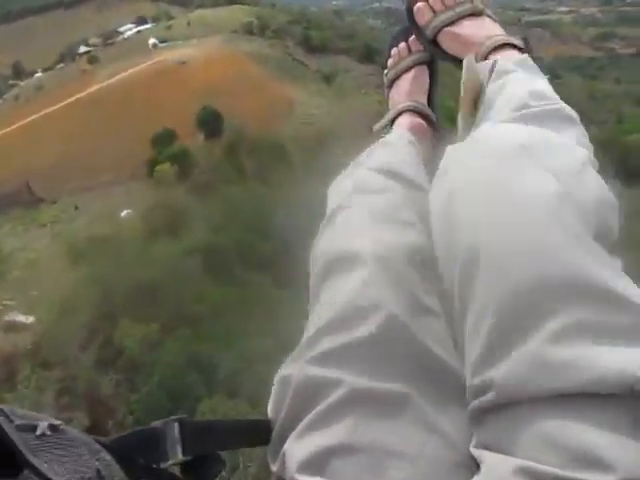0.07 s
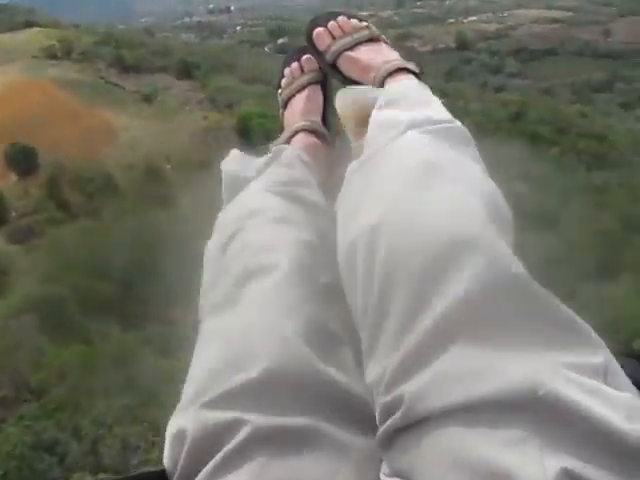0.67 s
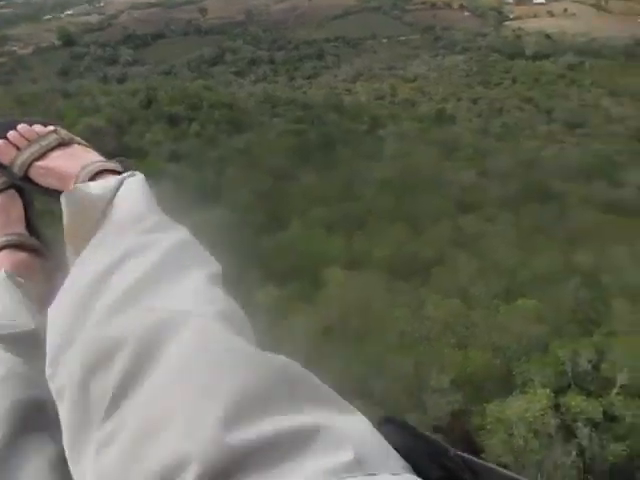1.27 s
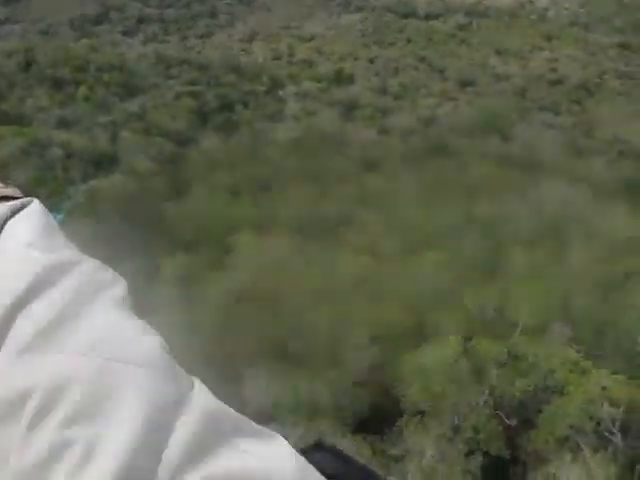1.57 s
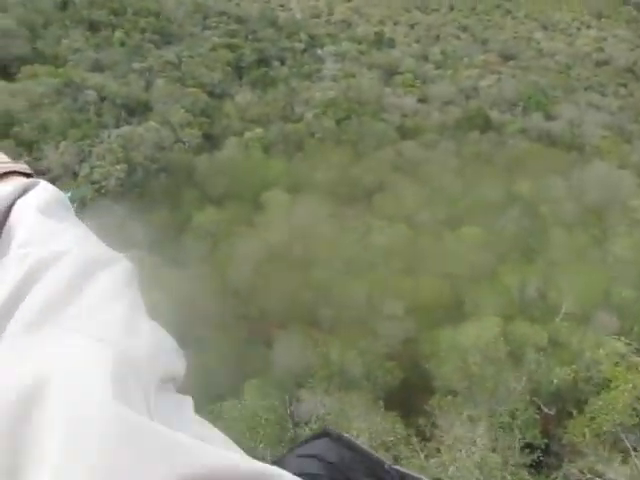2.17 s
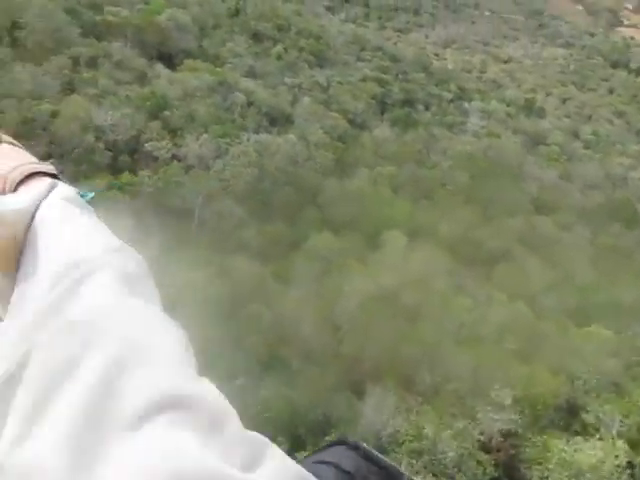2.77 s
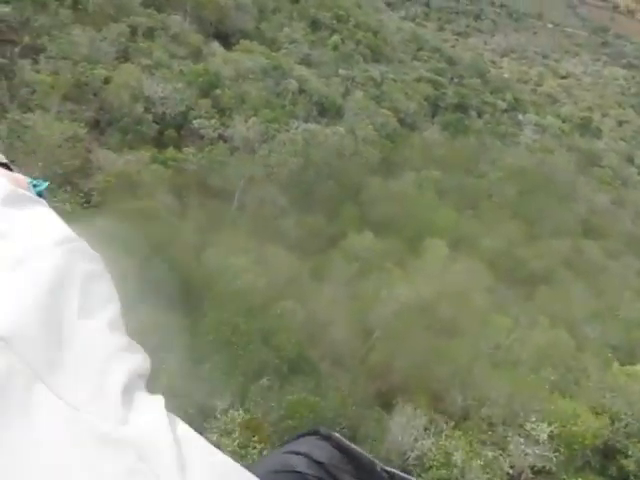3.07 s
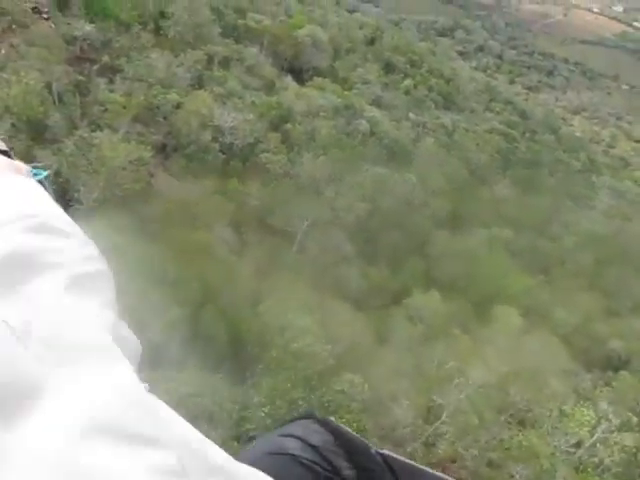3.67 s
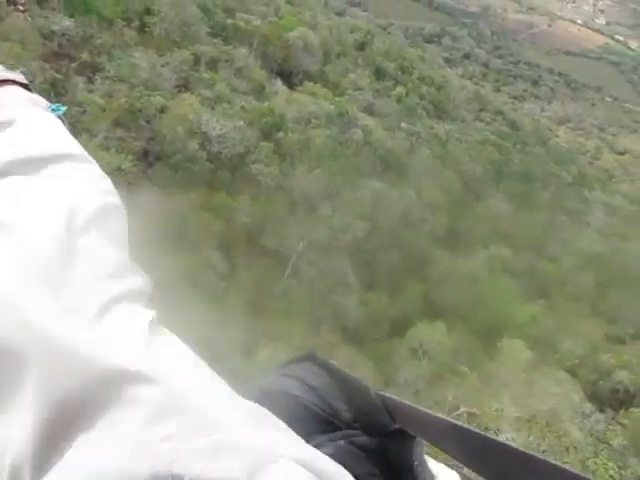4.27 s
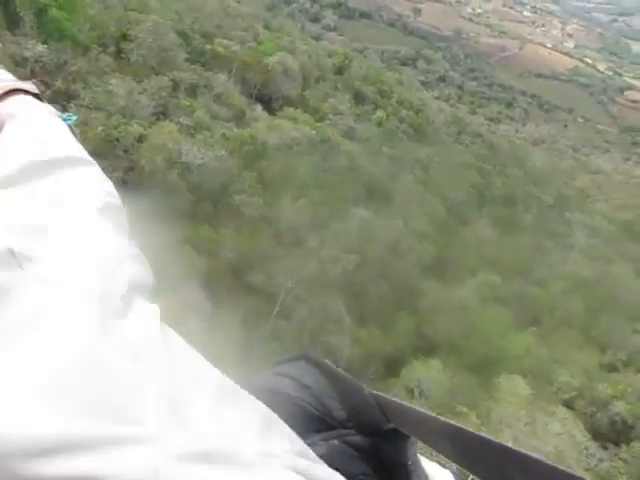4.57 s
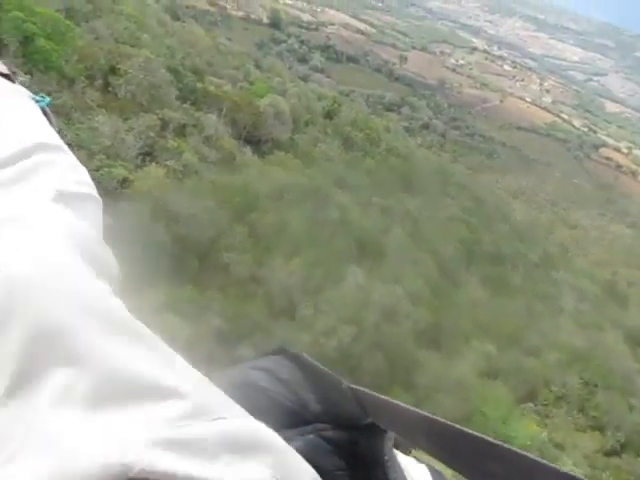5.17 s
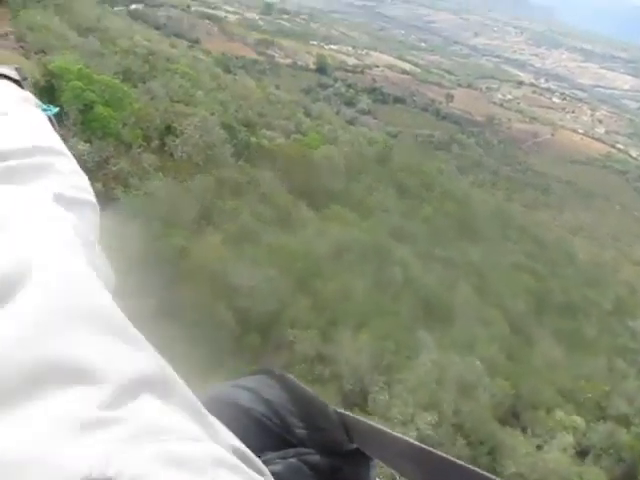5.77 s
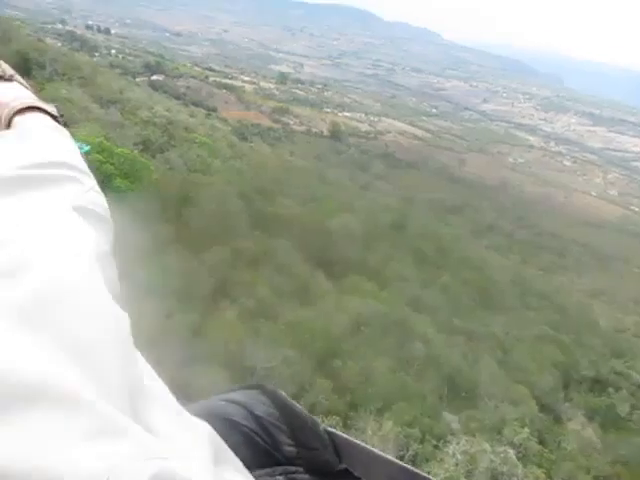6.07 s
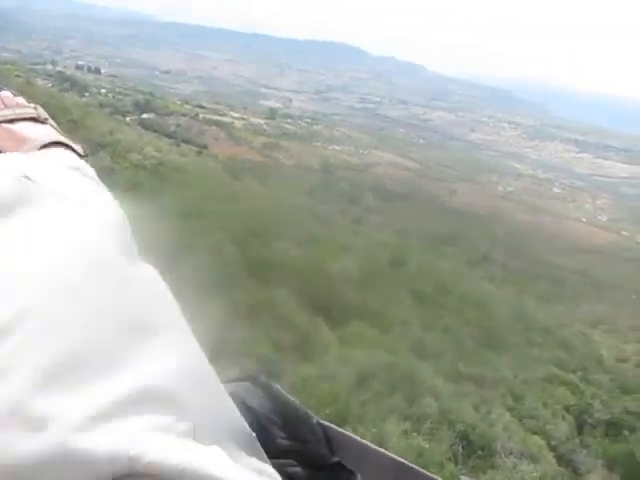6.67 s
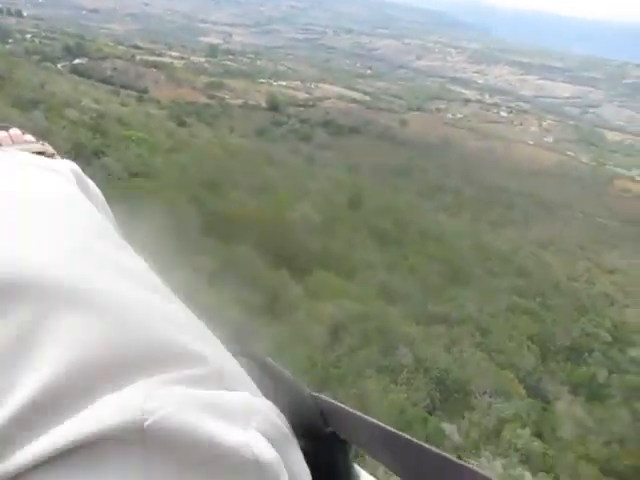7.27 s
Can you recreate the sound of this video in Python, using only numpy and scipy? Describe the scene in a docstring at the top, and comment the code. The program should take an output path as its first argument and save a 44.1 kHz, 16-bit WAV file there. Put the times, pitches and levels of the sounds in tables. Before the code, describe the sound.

Wind streams past a hand-held camera on a glider high above hills, a steady rush with low buffeting on the microphone. It starts soft, with a few faint finger scrapes, then grows stronger and brighter through the middle. Late on, a quick run of sharp ticks ends in two hard knocks on the case, followed by a light rub, more clicks and dull bumps. Everything is close, with no echo.

```python
"""Wind on a camera in a glider

High above hills, air streams past a hand-held camera, growing stronger and easing again.
It buffets the microphone port and rushes through the hollows of the case, whose resonances colour it.
A hand rubs and shifts on the camera: faint scrapes, sharp ticks, two hard knocks and a few dull bumps.
Underneath, the electronics hiss and whine faintly."""
import sys
import numpy as np
from scipy import signal
from scipy.fft import rfft, irfft, next_fast_len
from scipy.io import wavfile
from scipy.ndimage import map_coordinates

SR = 44100
rng = np.random.default_rng(int(sys.argv[2]) if len(sys.argv) > 2 else 0)


def digitize_waveform(pressure):
    """Quantize a signal to 16-bit integers and store it at the path in sys.argv[1].

    Rows of a 2-D input are taken as channels; values are limited to [-1, 1].
    """
    field = np.atleast_2d(pressure).T
    bounded = np.clip(field, -1, 1)
    quanta = np.round(bounded * 32767).astype(np.int16)
    wavfile.write(sys.argv[1], SR, quanta)


N = 331632

# The strength of the airstream, driving every wind layer. Each row: time in seconds, level in dB.
FLOW = [(0, -51), (.5, -53), (1, -50.5), (1.5, -52.5), (2.2, -50.5), (2.7, -46.5), (3.45, -45),
        (4.1, -43.5), (5.3, -43.5), (5.9, -48.5), (6.33, -45.8), (6.5, -46.5), (6.75, -45.5), (6.95, -49.5),
        (7.1, -44.5), (7.25, -43.5), (7.35, -45.5), (7.52, -44)]


def buffeting(lumps_db=1, churn_db=2.0, surge_db=1, rise_db_per_s=0.66):
    """Large eddies thump on the port in surges and smaller ones churn above them."""
    # Deep rumble and the churn above it. Each row: frequency in Hz, relative level in dB.
    large_spectrum = [(4, -6), (12, 0.5), (27, -3), (45, -5), (80, -11), (140, -25), (300, -33.5),
                      (900, -87)]
    small_spectrum = [(30, -19), (70, -4), (100, 3.5), (150, -1), (215, -4.5), (300, -11), (420, -21),
                      (900, -56)]
    large = unit(noise(large_spectrum) * amp(lumps_db * wobble(30) + surge_db * wobble(4.08)))
    small = unit(noise(small_spectrum) * amp(churn_db * wobble(35)))
    from_middle_s = (np.arange(N) - N / 2) / SR
    large *= amp(rise_db_per_s * from_middle_s)  # the air grows rougher as the flight goes on
    large *= wind_gain(base_db=-33.5, growth=0.51, cross_db=-1.5)
    small *= wind_gain(base_db=-46.5, growth=0.75, cross_db=9.2)
    return large + small


def airstream(rush_db=2, flutter_db=.5):
    """Air rushes over the case and sprays off its edges; all bands flutter together."""
    # Broad rush, bright spray and a narrow hollow note. Each row: frequency in Hz, relative level in dB.
    rush_spectrum = [(60, -21), (300, 3), (500, -0.5), (1000, 0.5), (1400, -0.5), (2000, -3.5), (2700, -16),
                     (4000, -38.5), (8000, -60)]
    spray_spectrum = [(1000, -15), (2000, 5), (2700, 0.5), (3600, -5.5), (5000, -9.5), (7000, -15),
                      (10000, -19.5), (13000, -28), (17000, -48)]
    hollow_spectrum = [(900, -14), (1450, -4), (1750, -1.5), (1880, 5), (2050, -13), (2700, -82)]
    rush = amp(envelope(FLOW) + rush_db) * noise(rush_spectrum, through_case=True)
    spray = wind_gain(base_db=-53, growth=1.71, cross_db=2.5) * noise(spray_spectrum, through_case=True)
    hollow = wind_gain(base_db=-59.5, growth=1.12, cross_db=12.6) * noise(hollow_spectrum)
    return (rush + spray + hollow) * amp(flutter_db * wobble(30))


def wind_gain(base_db, growth, cross_db, cruise_db=-47):
    """A wind layer's fader: it moves growth dB per dB of flow, and a full crosswind adds cross_db."""
    return amp(base_db + growth * (envelope(FLOW) - cruise_db) + cross_db * crosswind())


def crosswind():
    """How squarely the air crosses the port: each gust swells and fades like a bell curve."""
    # Each row: peak time in seconds, half length in seconds, strength from 0 to 1.
    gusts = [(2.12, .54, 0.99), (5.043, 0.52, 0.78)]
    t = np.arange(N) / SR
    return sum(strength * np.exp(-.5 * ((t - peak) / half) ** 2) for peak, half, strength in gusts)


def case_db(hz):
    """The lift that the hollows of the case give to each frequency."""
    # Each row: centre in Hz, width in Hz, lift in dB.
    hollows = [(569, 35, 5), (649, 67, 5.5), (1060, 60, 2), (1338, 110, 2), (2362, 215, 8),
               (3197, 400, 9.5), (4037, 195, 8.5), (4370, 255, 9), (5045, 570, 7.5), (5600, 350, 4.5),
               (6500, 570, 5.5), (7670, 850, 4.5), (11000, 400, 7)]
    return sum(db * np.exp(-np.log(2) * (2 * (hz - centre) / width) ** 2)
               for centre, width, db in hollows)


def handling(snap_t60=0.0087, snap_rise_s=.0001, crack_db=-21):
    """Ticks and knocks snap and ring the shell; bumps push on the microphone, which swings back."""
    # Small sharp contacts. Each row: start in seconds, snap level in dB, ring level in dB.
    ticks = [(0.771, -54, -38), (0.9403, -46, -36), (4.762, -34.5, -55), (5.6190, -23.5, -28.5),
             (5.7304, -21.5, -21.5), (5.7437, -26, -55), (5.754, -24, -50), (5.8564, -28.5, -27),
             (5.8974, -34, -55), (6.818, -32, -48), (6.8277, -27, -46), (6.9013, -29.5, -29),
             (6.9065, -41, -46)]
    # Hard blows. Each row: start in seconds, level in dB, place from 0 (stiff edge) to 1 (flat face).
    knocks = [(5.8307, -5, 0.16), (5.8326, -20, 0), (5.8678, -11.5, 0.96), (6.8655, -34, 1)]
    # Dull pushes. Each row: start in seconds, pressure in dB, decay and contact times in seconds.
    bumps = [(5.8674, -3.5, 0.0055, .0008), (6.8595, -5.5, 0.0018, 0.0051), (7.123, -15, 0.019, .012),
             (7.248, -14.5, 0.012, 0.0066)]
    # The bright snap of a contact. Each row: frequency in Hz, relative level in dB.
    snap_spectrum = [(200, -22), (1000, -10), (4000, -3), (5500, 1), (8000, 4.5), (11000, -2.5),
                     (14000, -8), (17000, -33)]
    body, snaps = np.zeros(N), np.zeros(N)
    t = np.arange(SR // 8) / SR
    snap = amp(-60 * t / snap_t60) * (1 - np.exp(-t / snap_rise_s))
    for start, db, ring_db in ticks:
        add(snaps, start, amp(db) * snap)
        add(body, start, amp(ring_db) * shell_ring(place=0.55))
    for start, db, place in knocks:
        add(snaps, start, amp(db + crack_db) * snap)
        add(body, start, amp(db) * shell_ring(place))
    for start, db, decay, contact in bumps:
        press = np.sin(np.pi * t[t < contact] / contact) ** 2
        swing = (1 - t / decay) * np.exp(-t / decay)
        add(body, start, amp(db) * np.convolve(swing, press / press.sum()))
    return body + snaps * noise(snap_spectrum, through_case=True)


def shell_ring(place, attack_s=0.0001, scatter_db=1):
    """The shell's modes after one blow; where it lands decides which ones speak."""
    # Each row: pitch in Hz, level in dB struck on the edge, the same on the face, t60 in seconds.
    modes = [(640, -13, -24.5, 0.072), (800, -28, -4.5, 0.025), (1084, -22, -5.5, 0.029),
             (1325, -6, 1.5, 0.015), (1468, 3.5, -19.5, 0.016), (1850, -15, -22, 0.025),
             (2283, -7.5, -8.5, 0.023), (2500, -10, -12, 0.012), (3130, -6, -6, 0.012),
             (4100, -10, -24, 0.019), (4810, -12, -22, 0.016), (5600, -17, -24, 0.013),
             (6440, -17, -21, 0.0078), (7640, -27, -34, 0.0071)]
    t = np.arange(SR // 8) / SR
    ring = np.zeros(len(t))
    for k, (hz, edge_db, face_db, t60) in enumerate(modes):
        db = np.interp(place, [0, 1], [edge_db, face_db]) + scatter_db * rng.standard_normal()
        ring += (-1) ** k * amp(db - 60 * t / t60) * np.sin(2 * np.pi * hz * t)
    return ring * (1 - np.exp(-t / attack_s))


def scrapes(slips_per_s=80, slip_db=3.5, grain_db=3, fade_share=0.53):
    """Skin sticks and slips over the case in grainy strokes that fade in and out."""
    # Strokes of the hand. Each row: start in seconds, length in seconds, level in dB.
    rubs = [(.232, 0.045, -53), (0.669, .07, -52.5), (0.76, 0.024, -52.5), (0.803, 0.062, -49.5),
            (0.93, 0.021, -46), (0.977, 0.013, -50), (5.815, 0.028, -44.5), (6.496, 0.49, -55.5),
            (6.808, 0.041, -41), (7.013, 0.017, -49)]
    # The rasp of skin. Each row: frequency in Hz, relative level in dB.
    skin_spectrum = [(500, 9), (1200, 2.5), (2400, 4), (3600, -10.5), (4500, -7), (5100, 5), (5800, -6),
                     (8000, -5.5), (9500, -14.5), (16000, -20)]
    strokes = np.zeros(N)
    slips = amp(slip_db * wobble(slips_per_s))
    for start, length, db in rubs:
        fade = signal.windows.tukey(round(length * SR), fade_share)
        stroke = fade * slips[round(start * SR):][:len(fade)]
        add(strokes, start, amp(db) * unit(stroke))
    rasp = noise(skin_spectrum, through_case=True) * amp(grain_db * wobble(400))
    return strokes * unit(rasp)


def electronics(hiss_db=-60, pulse_db=-75, first_s=.045, every_s=1, length_s=.11):
    """The camera's circuits whine and hiss, and a faint high hiss comes back at a steady beat."""
    # The thin whine. Each row: pitch in Hz, rms level in dB.
    tones = [(9685, -88), (15735, -93)]
    # Steady and pulsed hiss. Each row: frequency in Hz, relative level in dB.
    hiss_spectrum = [(100, 4.5), (1000, 4.5), (4000, 3), (6000, 0.5), (9000, -0.5), (12000, -5),
                     (15000, -10.5), (17000, -16)]
    pulse_spectrum = [(11000, -30), (14000, -3), (16000, 5), (17000, -7)]
    t = np.arange(N) / SR
    whine = sum(np.sqrt(2) * amp(db) * np.sin(2 * np.pi * hz * t + wobble(20)) for hz, db in tones)
    hiss = amp(hiss_db) * noise(hiss_spectrum)
    gate = (t - first_s) % every_s < length_s
    pulses = amp(pulse_db) * gate * noise(pulse_spectrum)
    return whine + hiss + pulses


def noise(spectrum, through_case=False):
    """Noise of rms 1, shaped by (Hz, dB) points on a log axis and, if asked, by the case."""
    points_hz, points_db = np.transpose(spectrum)

    def response(hz):
        db = np.interp(np.log(hz + 1), np.log(points_hz + 1), points_db)
        return amp(db + through_case * case_db(hz))
    return unit(filtered(rng.standard_normal(N), response))


def filtered(x, response):
    """x equalised by a gain that depends on frequency."""
    size = next_fast_len(len(x) + 8192)
    hz = np.fft.rfftfreq(size, 1 / SR)
    return irfft(rfft(x, size) * response(hz), size)[:len(x)]


def envelope(points):
    """Straight lines through (seconds, value) points, one value per sample."""
    times, values = np.transpose(points)
    return np.interp(np.arange(N) / SR, times, values)


def wobble(rate):
    """A smooth random curve, rate knots a second."""
    knots = rng.standard_normal(int(N * rate / SR) + 4)
    return map_coordinates(knots, [np.arange(N) * rate / SR])


def amp(db):
    """Decibels to gain."""
    return 10 ** (np.asarray(db) / 20)


def unit(x):
    """x at rms 1."""
    return x / np.sqrt(np.mean(x ** 2) + 1e-20)


def add(track, start_s, sound):
    """Mix a sound into the track at start_s."""
    part = track[round(start_s * SR):][:len(sound)]
    part += sound[:len(part)]


def scene():
    """Everything happens at the camera, in open air with no echo."""
    return (airstream() + buffeting() + scrapes() + handling())[None]


def record(dry, top_hz=17150):
    """The camera adds the noise of its electronics and keeps nothing above its band limit."""
    return filtered(dry[0] + electronics(), lambda hz: hz < top_hz)[None]


dry = scene()
out = record(dry)
digitize_waveform(out)
```